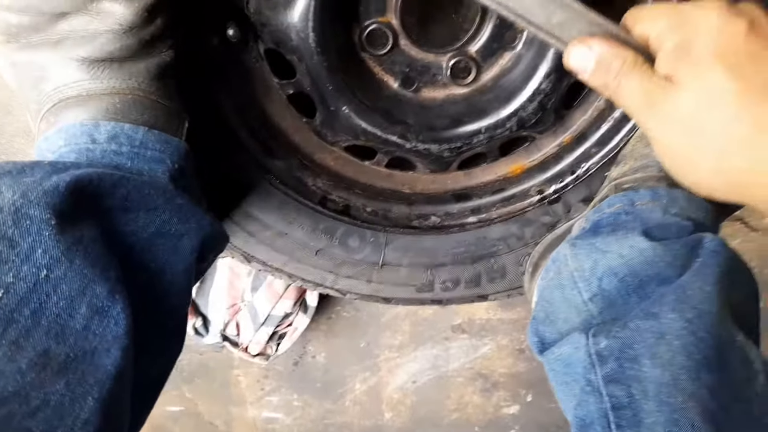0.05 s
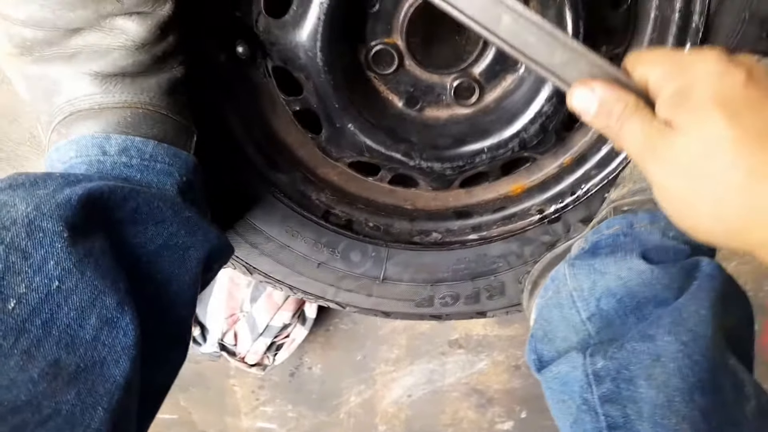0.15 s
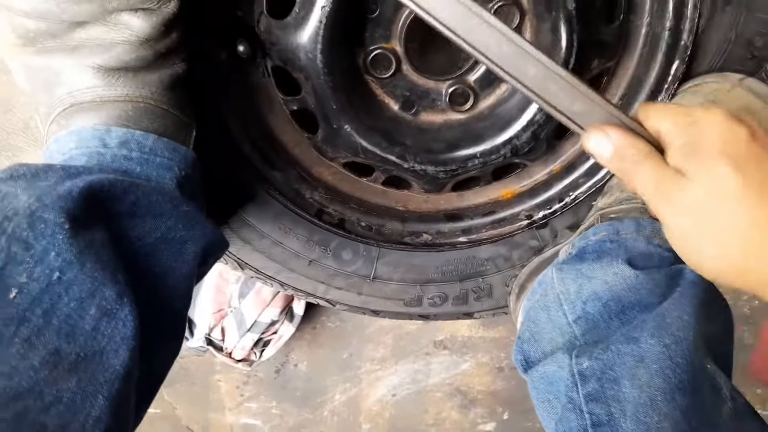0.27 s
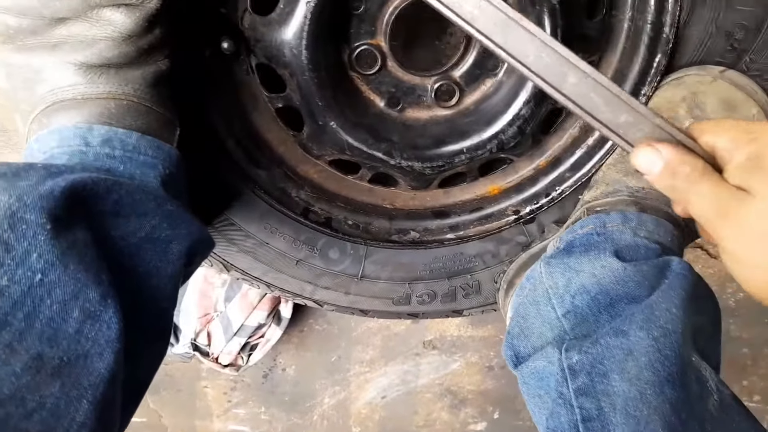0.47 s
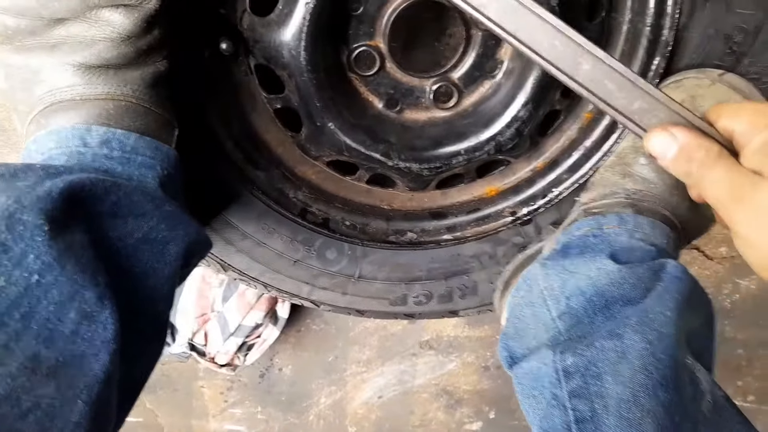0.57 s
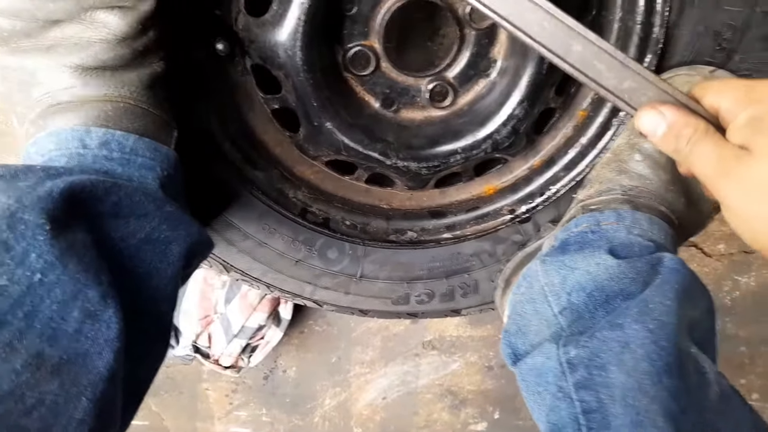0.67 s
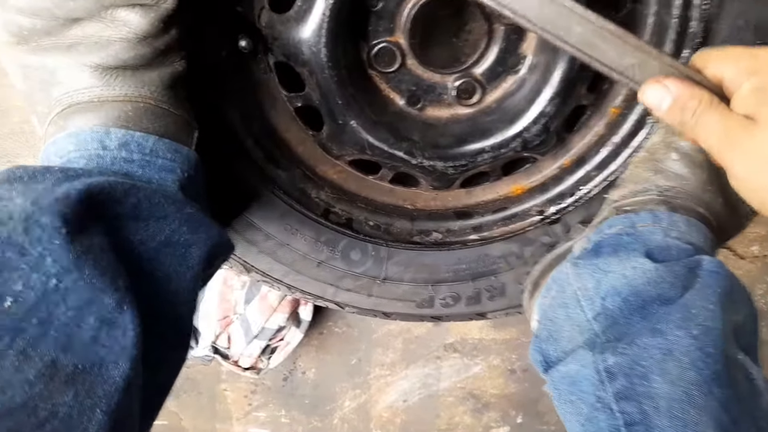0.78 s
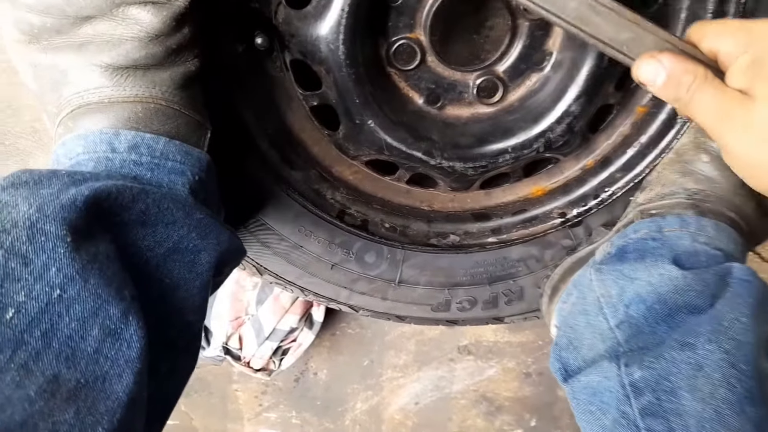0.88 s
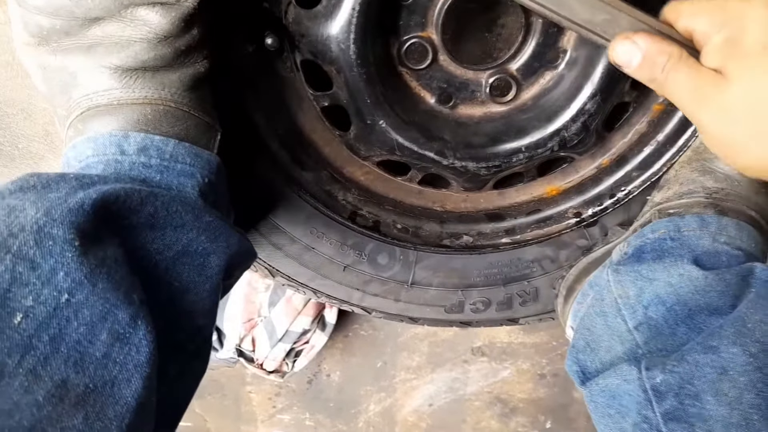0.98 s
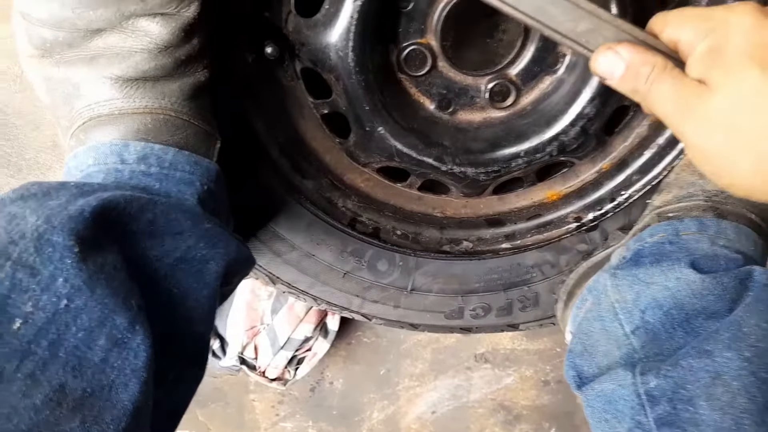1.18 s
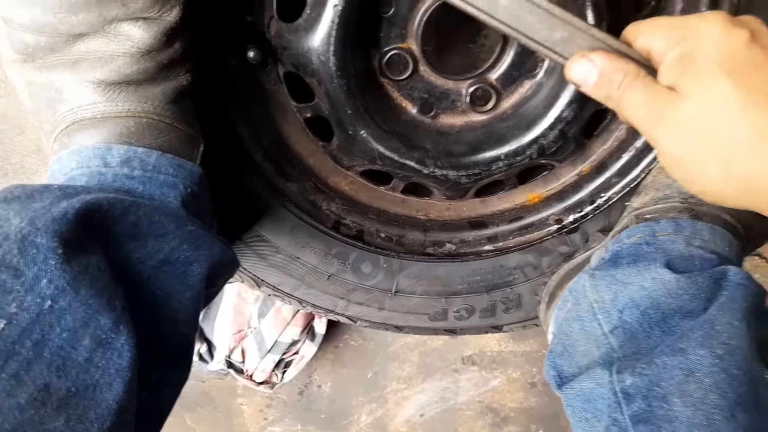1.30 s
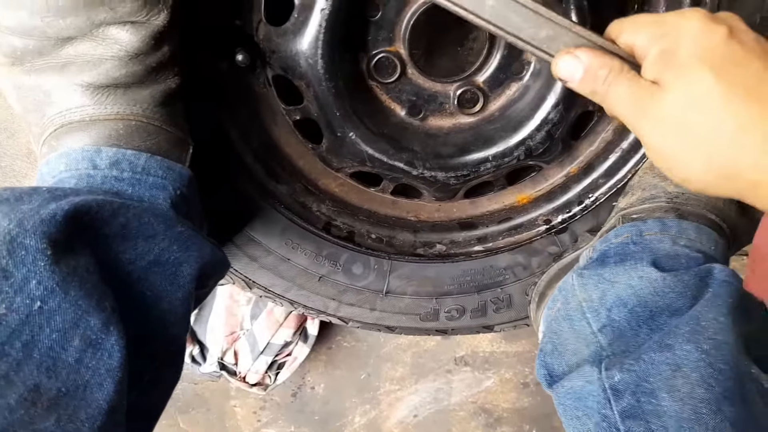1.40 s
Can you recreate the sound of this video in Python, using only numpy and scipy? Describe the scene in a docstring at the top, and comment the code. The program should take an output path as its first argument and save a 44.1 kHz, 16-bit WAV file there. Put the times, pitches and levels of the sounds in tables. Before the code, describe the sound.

A metal bar scrapes and clangs against a steel car wheel in a workshop.

```python
"""A steel bar is worked against a car wheel lying on the concrete floor of a workshop.
Stick-slip friction excites the wheel's resonances as the bar scrapes along the rim; the bar catches
and strikes, and the free modes of the steel give a bright clang. The rocking tyre thuds in its low
modes, then the bar drags twice more, lightly. The sound is close and slightly to the left,
in the reverberation of a hard room, over a low rumble of handling."""
import sys
import numpy as np
from scipy import signal
from scipy.fft import rfft, irfft
from scipy.io import wavfile

SR = 44100
rng = np.random.default_rng(int(sys.argv[2]) if len(sys.argv) > 2 else 0)


def persist_wave(psi):
    """Save psi, clipped to +-1, as 16-bit WAV."""
    counts = np.round(np.clip(psi, -1, 1) * 32767).astype(np.int16)
    wavfile.write(sys.argv[1], SR, np.atleast_2d(counts).T)


N = 63945

# Stereo balance of the sources. Each row: frequency in Hz, left minus right level in dB.
PAN = [(100, -2), (300, -4), (550, -4), (1200, 8), (2300, 5.5), (3600, -2.5), (5000, -2), (8000, 1),
       (13000, -3)]


def clang():
    """Free vibration: modes hold while the bar chatters, then decay; faint detuned twins ring on."""
    # Free modes of bar and rim. Each entry: frequency in Hz.
    modes_hz = [295, 343, 1454, 1695, 2135, 2355, 2750, 3092, 3505, 3550, 3602, 4037, 4330, 4640, 4831,
                4970, 5394, 5856, 5944, 6131, 7111, 7445, 8872, 10950]
    # The same modes in turn. Each row: level in dB, T60 in seconds, left minus right in dB,
    # level of the twin in dB.
    ringing = [(-34, .25, -0.5, -44.5), (-36, .2, 6.5, -59.5), (-9.5, 0.15, 6, -40), (-28.5, .2, 9, -48.5),
               (-33.5, 0.3, 6, -46.5), (-24, .25, 2.5, -53), (-39, .2, 3, -57.5), (-33, 0.4, 0, -53.5),
               (-32.5, .22, 2, -50.5), (-34, .4, -1, -45), (-25.5, 0.073, -1.5, -45.5),
               (-39, .28, -0.5, -53), (-40.5, .35, 2.5, -54.5), (-48, .4, -6.5, -61.5),
               (-32.5, 0.33, 1, -52), (-26.5, .3, -15, -50.5), (-27, .23, -6.5, -59),
               (-30, 0.16, -0.5, -59.5), (-36.5, .2, -3, -61.5), (-32.5, 0.29, 8.5, -61.5),
               (-37.5, 0.091, 7, -64.5), (-47.5, .15, 0.5, -68), (-52, .3, -0.5, -83),
               (-52.5, .25, -3.5, -83)]
    attack_s, hold_s, right_lag_s = .0008, 0.022, .00004
    twin_t60_s, twin_spread_hz = 1, 5.5
    # The bar settles on the rim and damps the lower modes, this long after the clang begins.
    settle_s, damping_db_per_s, damped_below_hz = 0.3666, 70, 2500
    t, out = np.arange(N) / SR, 0
    arrival = t - np.array([[0], [right_lag_s]])
    for hz, (db, t60, pan_db, twin_db) in zip(modes_hz, ringing):
        envelope = from_db(db - 60 * np.maximum(t - hold_s, 0) / t60)
        main = envelope * np.sin(2 * np.pi * (hz * arrival + rng.random()))
        twin_hz = hz + twin_spread_hz * rng.standard_normal()
        twin = decay(twin_t60_s) * np.sin(2 * np.pi * (twin_hz * t + rng.random((2, 1))))
        damped_db = damping_db_per_s * np.maximum(t - settle_s, 0) * (hz < damped_below_hz)
        out = out + panned(pan_db) * main + from_db(twin_db - damped_db) * twin
    return out * (1 - np.exp(-t / attack_s))


def blows():
    """Impact excitation: each blow cracks through the disc's dense modes; the hardest starts the clang."""
    # Blows of the bar. Each row: start in seconds, level in dB, spectral tilt in dB per octave.
    impacts = [(0.2575, 0, 2.5), (0.3206, -3.5, 4.5), (0.3215, 1.5, -4.5), (0.332, -1, 5.5),
               (0.3338, 3, -3.5), (0.339, -2, 3)]
    # Spectrum of the struck steel disc. Each row: frequency in Hz, spectral density in dB.
    disc_colour = [(60, -25), (140, -7), (220, -16), (350, -0.5), (520, -10.5), (700, -24), (900, -9.5),
                   (1200, -1), (1600, 8.5), (1950, -4.5), (2500, 0), (3000, -7.5), (3600, -2), (4600, -15),
                   (7200, -16.5), (8000, -26), (9500, -29), (15000, -33)]
    # Damping of the disc. Each row: frequency in Hz, T60 in seconds.
    disc_t60s = [(150, 0.05), (1200, 0.037), (4000, .11), (8000, .08), (14000, 0.051)]
    crack_db, crack_t60_s, disc_db, clang_start_s = -13, .022, -17, 0.3334
    out = np.zeros((2, N))
    for s, db, tilt_db in impacts:
        crack = noise(disc_colour, tilt_db=tilt_db, envelope=decay(crack_t60_s))
        disc = octave_decay(noise(disc_colour, tilt_db=tilt_db), disc_t60s)
        add(out, s, from_db(db + crack_db) * crack + from_db(db + disc_db) * disc)
    add(out, clang_start_s, clang())
    return out


def stick_slip(stroke, colour, column):
    """Stick-slip friction: tiny uneven slips drive the disc and the wheel's resonances."""
    # Resonances of the wheel under the bar, weighted by the place of contact. Each row: frequency
    # in Hz, then level in dB for a hard stroke, a light stroke and a brush.
    resonances = [(147, -8, -15.5, -14), (297.7, -6.5, -5, -3.5), (522, -17.5, -27, -26),
                  (770, -22, -17, -12.5), (848.2, -14, -12, -24), (1161, -5.5, -4, -7.5),
                  (1456, 2.5, -1.5, -8.5), (1724, -8.5, -17, -12), (2204, -18.5, -5.5, -27.5),
                  (2296, -11, -8.5, -15), (3454, -28, -15.5, -20)]
    slips_per_s, spread_db, slip_t60_s, response_db = 2100, 2, 0.018, -1.5
    bass_t60_s, half_t60_hz = 0.27, 1300
    sizes = from_db(spread_db * np.minimum(rng.exponential(1, N), 4)) * rng.choice([-1, 1], N)
    slipping = rng.random(N) < slips_per_s / SR
    slips = unit_rms(sizes * slipping) * level(stroke)
    response = unit_rms(noise(colour, envelope=decay(slip_t60_s)))
    for hz, *levels_db in resonances:
        ring = unit_rms(mode(hz, bass_t60_s / (1 + hz / half_t60_hz)))
        response += from_db(levels_db[column]) * panned(at_hz(PAN, hz)) * ring
    return convolve(slips, from_db(response_db) * response / np.sqrt(N))


def scrapes():
    """Sliding friction: hard, light and brushing strokes along the rim each have their own spectrum."""
    # Friction in each kind of stroke. Each row: time in seconds, level in dB.
    hard = [(0.12, -71.5), (0.165, -59), (0.198, -54.5), (0.203, -43), (0.216, -39.5), (0.221, -32.5),
            (0.25, -27), (0.275, -27), (0.297, -26), (0.316, -44), (0.33, -72)]
    light = [(0.9748, -83), (0.9762, -36), (1.008, -42.5), (1.015, -35), (1.04, -41), (1.06, -46),
             (1.075, -67.5)]
    brush = [(0.0, -43), (0.03, -58), (0.075, -67), (0.5, -110), (1.04, -85), (1.08, -60.5), (1.155, -62.5),
             (1.167, -49), (1.183, -55.5), (1.198, -49.5), (1.212, -55.5), (1.235, -65), (1.45, -100)]
    # Spectra of the rubbed steel. Each row: frequency in Hz, spectral density in dB.
    hard_colour = [(80, -22), (140, -12.5), (215, -25), (300, -8.5), (410, -17), (520, -5), (630, -22),
                   (710, -27), (830, -7.5), (990, -15.5), (1270, 0.5), (1950, -10.5), (2400, -1.5),
                   (3100, -12), (3600, -11.5), (4600, -17.5), (7000, -14.5), (8000, -41), (10000, -26.5),
                   (14500, -19.5)]
    light_colour = [(100, -19), (220, -22), (310, -12), (420, -3), (560, 1.5), (670, -7), (830, -1),
                    (990, -19.5), (1150, -6.5), (1950, -5.5), (2200, 1), (2900, -14), (3900, -11.5),
                    (4800, -20), (6600, -12), (8200, -34), (10000, -28.5), (11000, -21.5), (15000, -22)]
    brush_colour = [(200, -8), (550, -10.5), (950, -8.5), (1150, 4), (1900, -1), (2400, -3.5), (4500, -12),
                    (6700, -9), (8300, -24), (11500, -13.5), (15000, -12.5)]
    strokes = [(hard, hard_colour), (light, light_colour), (brush, brush_colour)]
    return sum(stick_slip(stroke, colour, column) for column, (stroke, colour) in enumerate(strokes))


def tyre():
    """Soft impact: force pulses drive the tyre's low modes; longer contact gives a duller thud."""
    # The tyre rocks on the floor. Each row: start in seconds, level in dB, contact time in seconds.
    thuds = [(0.229, -64, 0.0053), (0.282, -25, 0.0024), (0.288, -51.5, 0.0034), (0.4847, -31.5, 0.00078),
             (0.4924, -25, 0.0026), (0.4992, -20, 0.0039), (0.556, -34.5, .010), (0.757, -40, 0.0056),
             (0.778, -39, 0.00537), (0.852, -41.5, 0.0054)]
    # Modes of tyre and wheel. Each row: frequency in Hz, level in dB, T60 in seconds.
    low_modes = [(66.6, -15.5, 0.093), (98, -20, .1), (145, -1, 0.072), (176, -12, .12), (321, -4.5, .12),
                 (483, -13.5, .04)]
    t, force = np.arange(N) / SR, np.zeros((1, N))
    for s, db, contact_s in thuds:
        pulse = np.sin(np.pi * np.minimum(t / contact_s, 1)) ** 2
        add(force, s, from_db(db) * pulse / pulse.sum())
    return convolve(force, sum(from_db(db) * mode(hz, t60) for hz, db, t60 in low_modes))


def workshop(direct):
    """Diffuse reverberation: echoes in a hard room build up, then die away fastest in the treble."""
    # Reverberation time. Each row: frequency in Hz, T60 in seconds.
    room_t60s = [(150, .6), (500, 0.8), (2000, 0.98), (5000, 0.72), (8000, 0.34), (14000, 0.13)]
    # Spectrum of the echoes. Each row: frequency in Hz, level in dB.
    room_colour = [(100, -17), (300, -18.5), (600, -14), (1450, -27.5), (2400, -19.5), (3600, -17.5),
                   (6000, -14.5), (9000, -10.5), (15000, -2)]
    build_up_s = .012
    onset = 1 - np.exp(-np.arange(N) / SR / build_up_s)
    tail = octave_decay(noise(room_colour, pan_share=0), room_t60s) * onset
    return convolve(direct, tail / np.linalg.norm(decay(at_hz(room_t60s, 1000))))


def handling():
    """Amplitude-modulated noise: the wheel rumbles as it is handled."""
    # Course of the rumble. Each row: time in seconds, level in dB.
    swells = [(0.0, -47), (0.08, -64.5), (0.18, -46.5), (0.3, -47), (0.42, -54), (0.58, -45.5),
              (0.72, -59.5), (0.79, -62), (0.92, -56.5), (1.0, -55.5), (1.12, -53.5), (1.2, -50.5),
              (1.3, -60), (1.45, -67)]
    # Spectrum of the rumble. Each row: frequency in Hz, spectral density in dB.
    rumble_colour = [(25, -20.5), (45, -14.5), (65, 6), (95, -0.5), (135, 3), (220, -17), (300, 1.5),
                     (420, -19), (900, -26.5), (3000, -42)]
    return level(swells) * noise(rumble_colour)


def still_air():
    """Stationary noise: the faint, steady background of the room."""
    # Spectrum of the air. Each row: frequency in Hz, spectral density in dB.
    air_colour = [(30, -3.5), (100, -2), (400, -3), (1000, -12.5), (3000, -20.5), (6500, -16),
                  (8500, -31.5), (15000, -15.5)]
    return from_db(-68) * noise(air_colour, pan_share=0)


def noise(colour, pan_share=1, tilt_db=0, envelope=1):
    """Partial coherence: mid and side noise mix to stereo and pass a filter of unit power gain."""
    # Likeness of the channels. Each row: frequency in Hz, left-right correlation from -1 to 1.
    likeness = [(100, 0.76), (300, .95), (600, 1), (1300, 0.44), (2500, -0.47), (5000, -0.055),
                (13000, -.2)]
    hz = np.arange(N // 2 + 1) * SR / N
    mid, side = rfft(rng.standard_normal((2, N)) * envelope)
    correlation = np.clip(at_hz(likeness, hz), -1, 1)
    stereo = np.sqrt((1 + correlation) / 2) * mid + np.sqrt((1 - correlation) / 2) * side * [[1], [-1]]
    octaves = np.log2(np.maximum(hz, 500) / 2000)  # the tilt pivots at 2 kHz, flat below 500 Hz
    gain = unit_rms(from_db(at_hz(colour, hz) + tilt_db * octaves))
    return irfft(stereo * panned(pan_share * at_hz(PAN, hz)) * minimum_phase(gain), N)


def minimum_phase(gain):
    """Causality: folding the cepstrum gives a filter of this gain in which nothing sounds early."""
    cepstrum, k = irfft(np.log(gain), N), np.arange(N)
    fold = (k == 0) + 2 * ((k > 0) & (k < N / 2))
    return np.exp(rfft(cepstrum * fold))


def octave_decay(x, t60s):
    """Frequency-dependent damping: each octave from 125 Hz up dies at its own rate."""
    hz, spectrum = np.arange(N // 2 + 1) * SR / N, rfft(x)
    octave = np.clip(np.log2(np.maximum(hz, 1) / 125), 0, 7)
    bands = [irfft(spectrum * np.maximum(1 - abs(octave - k), 0), N) for k in range(8)]
    return sum(band * decay(at_hz(t60s, 125 * 2 ** k)) for k, band in enumerate(bands))


def mode(hz, t60):
    """Damped oscillator: one decaying sine."""
    return np.sin(2 * np.pi * hz * np.arange(N) / SR) * decay(t60)


def decay(t60):
    """Exponential decay: a fall of 60 dB in t60 seconds."""
    return from_db(-60 * np.arange(N) / SR / t60)


def level(points):
    """Amplitude envelope through rows of seconds and dB, falling 1000 dB a second outside them."""
    t, (s, db) = np.arange(N) / SR, np.transpose(points)
    outside_s = abs(t - np.clip(t, s[0], s[-1]))
    return from_db(np.interp(t, s, db) - 1000 * outside_s)


def panned(db):
    """Constant-power panning: left and right gains for a level difference."""
    gains = from_db(np.array([[.5], [-.5]]) * db)
    return gains / np.sqrt(np.mean(gains ** 2, axis=0))


def convolve(x, response):
    """Convolution: a linear system's output, from its impulse response."""
    return signal.fftconvolve(np.atleast_2d(x), np.atleast_2d(response), axes=1)[:, :N]


def add(out, s, sound):
    """Superposition: mix a sound in from s seconds on."""
    start = int(max(s, 0) * SR)
    out[:, start:] += sound[..., :N - start]


def at_hz(points, hz):
    """Interpolation of a table on a log-frequency axis."""
    frequencies, values = np.transpose(points)
    return np.interp(np.log(np.maximum(hz, 1)), np.log(frequencies), values)


def from_db(db):
    """Amplitude ratio for a level in decibels."""
    return 10 ** (np.asarray(db) / 20)


def unit_rms(x):
    """Normalisation to unit power."""
    return x / np.sqrt(np.mean(x ** 2) + 1e-20)


def scene():
    """Superposition: direct sound of bar, wheel and tyre, its reverberation, and the background."""
    direct = scrapes() + blows() + tyre()
    background = handling() + still_air()
    return direct + workshop(direct) + background


def record(dry):
    """Band limiting and clipping: the deep bass is thinned, peaks stop at full scale, the top is cut."""
    low_cut_hz, high_cut_hz = 69, 16800
    high_pass = signal.butter(2, low_cut_hz, "high", fs=SR, output="sos")
    low_pass = signal.cheby2(14, 70, high_cut_hz, fs=SR, output="sos")
    clipped = np.clip(signal.sosfilt(high_pass, dry), -1, 1)
    return signal.sosfilt(low_pass, clipped)


dry = scene()
out = record(dry)
persist_wave(out)
```